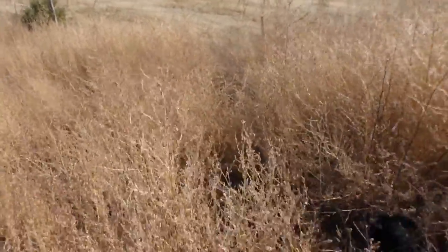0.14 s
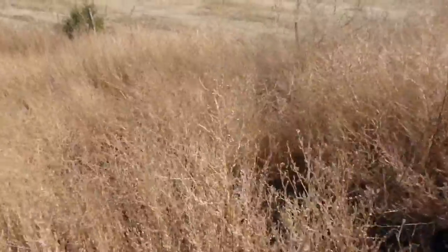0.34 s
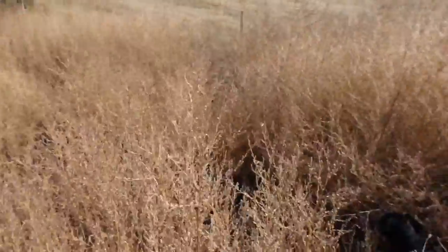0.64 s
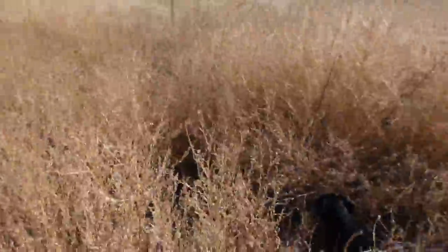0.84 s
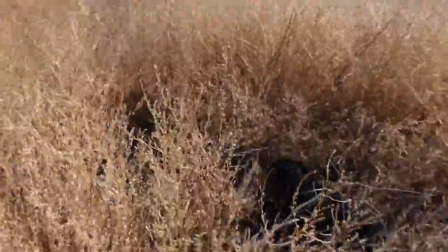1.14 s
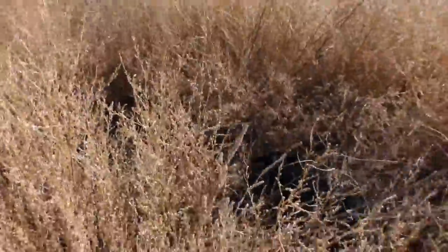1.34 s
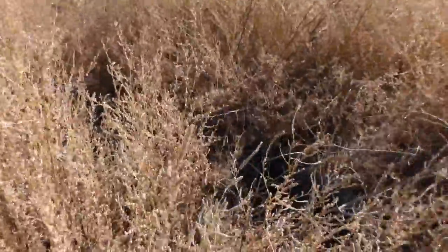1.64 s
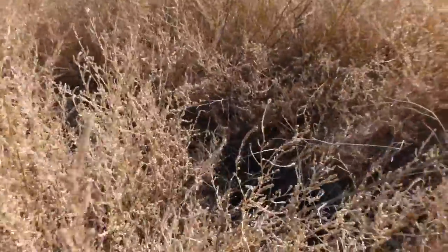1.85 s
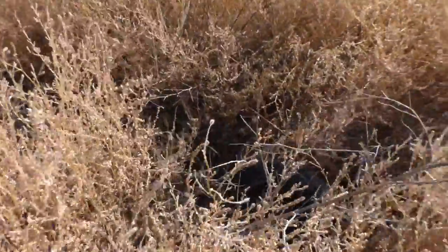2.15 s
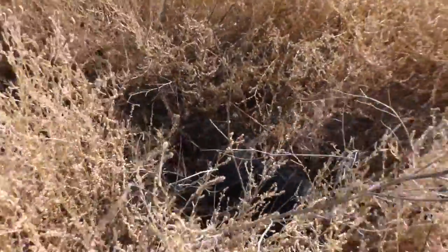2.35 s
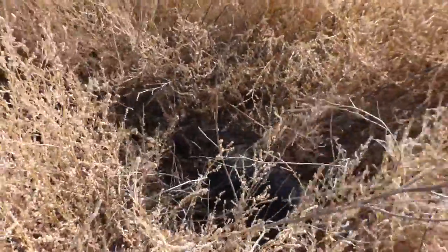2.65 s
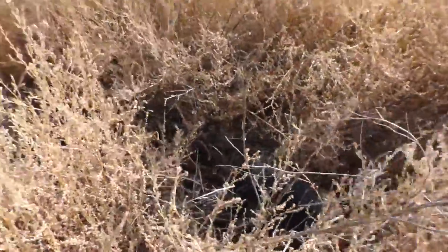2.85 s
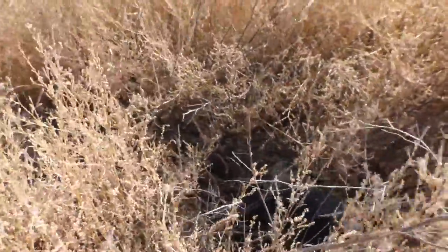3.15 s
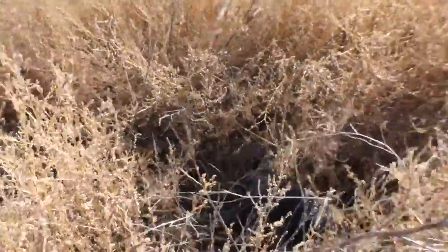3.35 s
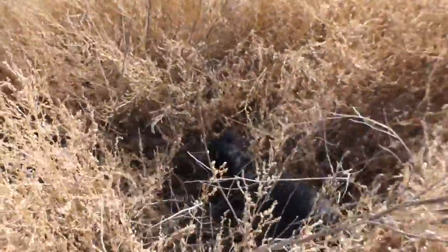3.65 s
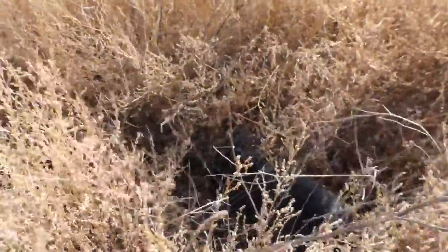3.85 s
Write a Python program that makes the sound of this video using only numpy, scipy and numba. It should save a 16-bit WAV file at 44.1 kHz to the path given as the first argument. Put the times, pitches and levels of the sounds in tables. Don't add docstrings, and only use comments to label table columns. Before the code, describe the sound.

Close outdoor sound of brittle stems cracking irregularly over a dry seed-head hiss. Gusts buffet the unprotected microphone for the first half, then mostly fade while the rustling grows, over faint open air.

```python
import sys
import numpy as np
from scipy import signal
from scipy.fft import rfft, irfft
from scipy.io import wavfile
from scipy.ndimage import uniform_filter1d
from numba import njit

SR = 44100
rng = np.random.default_rng(int(sys.argv[2]) if len(sys.argv) > 2 else 0)


def generate_wav(signal):
    frames = np.transpose(np.atleast_2d(signal))
    scaled = np.clip(frames, -1, 1) * 32767
    pcm = np.round(scaled).astype(np.int16)
    wavfile.write(sys.argv[1], SR, pcm)


def elevation(decibels):
    levels = np.asarray(decibels, float)
    return 10 ** (levels / 20)


N = 176400


def unit(x):
    return x / np.sqrt(np.mean(x ** 2))


def curve(rows, column):
    rows = np.array(rows, float)
    return np.interp(np.arange(N) / SR, rows[:, 0], rows[:, column])


def colour(x, points):
    hz, db = np.array(points, float).T
    f = np.maximum(np.arange(N // 2 + 1) * SR / N, 1)
    gain = elevation(np.interp(np.log(f), np.log(hz), db))
    return irfft(rfft(x) * gain, N)


@njit
def svf(x, hz, k):
    y, b, l = np.empty((3, len(x))), 0., 0.
    for i in range(len(x)):
        g = np.tan(np.pi * hz[i] / SR)
        v = (b + g * (x[i] - l)) / (1 + g * (g + k))
        low = l + g * v
        y[0, i], y[1, i], y[2, i] = low, k * v, x[i] - k * v - low
        b, l = 2 * v - b, 2 * low - l
    return y


def low_pass(x, hz, k):
    return svf(x, hz, k)[0]


def band_pass(x, hz, k):
    return svf(x, np.full(len(x), float(hz)), k)[1]


def walk(rate):
    k = int(SR / rate)
    steps = np.repeat(rng.standard_normal(N // k + 1), k)
    return unit(uniform_filter1d(uniform_filter1d(steps, k), k)[:N])


def fade(x, seconds):
    return signal.lfilter([1], [1, -np.exp(-1 / (seconds * SR))], x)


# start [t/s], length [t/s], buffeting [level/dB], share of
# quick small eddies [level/dB]
WIND_PUFFS = [(0, 0.016, -20, 3), (0.02, 0.064, -17.5, -2.5), (0.074, 0.079, -19, -9.5),
              (0.147, 0.075, -19, -2.5), (0.213, 0.041, -17, -10.5), (0.26, 0.037, -16, -8.5),
              (0.293, 0.059, -18.5, 4), (0.355, 0.035, -20.5, -0.5), (0.4, 0.049, -19.5, -1.5),
              (0.448, 0.023, -16, -7.5), (0.478, 0.034, -24, -5), (0.518, 0.027, -17, -14),
              (0.554, 0.077, -24.5, -11), (0.642, 0.067, -25.5, -12.5), (0.731, 0.051, -32, -18),
              (0.797, .13, -20.5, -11), (0.94, 0.1, -25, -15.5), (1.044, 0.043, -33, -14.5),
              (1.092, 0.048, -22, -23.5), (1.139, 0.16, -20.5, -17), (1.296, 0.17, -28, -19.5),
              (1.478, 0.057, -22, -17.5), (1.543, 0.1, -23.5, -20), (1.663, 0.076, -24, -20.5),
              (1.748, 0.053, -43, -25), (1.866, 0.041, -42.5, -20.5), (1.943, 0.032, -30.5, -22.5),
              (2.006, 0.086, -31, -30), (2.096, 0.17, -23.5, -19), (2.235, 0.061, -20, -7.5),
              (2.296, 0.016, -24, -20), (2.317, 0.048, -42.5, -21), (2.384, 0.094, -27.5, -15.5),
              (2.493, 0.15, -30.5, -25.5), (2.606, 0.079, -31.5, -26.5), (2.708, 0.095, -34.5, -33),
              (2.958, 0.061, -44.5, -31), (3.094, 0.093, -45, -21), (3.656, 0.097, -38.5, -33),
              (3.769, 0.12, -31, -26.5), (3.879, 0.02, -27, -16.5), (3.92, 0.069, -30.5, -24)]


def puffs():
    sag_db_per_s, edge = 26, int(0.011 * SR)
    power, quick = np.full(N, 1e-7), np.full(N, -2e-6)
    for s, length, db, share_db in WIND_PUFFS:
        start, stop = max(int(s * SR), 0), min(int((s + length) * SR), N)
        from_middle_s = np.arange(start, stop) / SR - s - length / 2
        power[start:stop] += elevation(2 * db)
        quick[start:stop] += elevation(2 * db) * (share_db - sag_db_per_s * from_middle_s)

    def soften(x):
        return uniform_filter1d(uniform_filter1d(x, edge), edge)
    return soften(np.sqrt(power)), soften(quick) / soften(power)


# time [t/s], added share of quick eddies [level/dB]
WHIPS_OF_AIR = [(0.042, 5), (0.066, 6.5), (.078, 5), (0.123, 3.5), (.168, 7.5), (.183, 3), (.198, 9.5),
                (0.207, 4.5), (.265, 8.5), (.281, 3.5), (0.297, 9), (.362, 5), (.386, 5.5), (.409, 6),
                (0.462, 0), (.542, 7.5), (.656, 7.5), (0.812, 6.5), (.866, 5.5), (0.921, 3.5), (1.016, 7),
                (1.031, 7.5), (1.165, 7), (1.437, 10), (1.512, 9.5), (1.572, 7), (2.28, 4.5), (2.395, 4),
                (2.55, 9.5), (3.94, 7.5)]


def whips():
    kick = np.zeros(N)
    s, db = np.array(WHIPS_OF_AIR).T
    kick[(s * SR).astype(int)] = db
    t = np.arange(-1024, 1025) / SR
    rise = np.exp(-(t / 0.0041) ** 2)
    return signal.fftconvolve(kick, rise, "same"), kick * rng.choice([-1, 1], N)


def wind():
    eddy_hz, pitch_db_per_db, waver_db = 588, 0.6838, 1.0
    flutter_db, flutter_per_s, port_hz = 2, 55, 78
    breeze_db, breeze_hz = -52, 72.2
    gain, share_db = puffs()
    whip_db, kick = whips()
    gain = gain * elevation(0.19 * whip_db)
    share_db = share_db + whip_db
    hz = np.clip(eddy_hz * elevation(pitch_db_per_db * share_db + waver_db * walk(90)), 40, 3000)

    flutter = rng.standard_normal(N) * elevation(flutter_db * walk(flutter_per_s))
    push = (flutter + 1.94 * kick) / np.sqrt(hz)
    edges = low_pass(push, hz, 1.75)
    edges = low_pass(edges, 2.88 * hz, 1.33)
    edges = low_pass(edges, 3.96 * hz, 1.21)
    sharp_edges = elevation(-2.5 + 3.82 * walk(300)) * edges
    eddies = low_pass(edges, 1.84 * hz, 2.08) + sharp_edges

    port = np.full(N, float(port_hz))
    eddies = svf(eddies, port, 1.0)[2]
    eddies = svf(eddies, 0.58 * port, 2.24)[2]
    slow = np.sqrt(uniform_filter1d(eddies ** 2, int(.028 * SR)) + 1e-12)

    lull = band_pass(rng.standard_normal(N), breeze_hz, 0.72)
    lull = low_pass(lull, np.full(N, 130.), 0.79)
    return eddies / slow * gain + unit(lull) * elevation(breeze_db + 1.7 * walk(12))


# time [t/s], level [level/dB]
BRUSHING_LEVEL = [(0, -46.5), (.18, -52.5), (.41, -62.5), (.62, -55.5), (.95, -61.5), (1.1, -59),
                  (1.39, -51.5), (1.7, -58.5), (2.35, -54), (2.6, -50), (2.88, -48), (3.2, -49.5),
                  (3.32, -42.5), (3.55, -41.5), (3.7, -48.5), (3.8, -51.5), (3.86, -47), (4, -44)]
# frequency [f/Hz], density [level/dB per Hz]
SEED_HEAD_SPECTRUM = [(180, -40), (300, -18), (484, -9), (877, -5), (1220, -3.5), (6680, -6), (13100, -4),
                      (15500, -2.5)]


def ticks(rate):
    spread_db, top_db, level_db, decay_s = 3, 13, -5, 0.0028
    size_db = np.minimum(spread_db * rng.exponential(size=N), top_db)
    hits = (rng.random(N) < rate / SR) * elevation(size_db)
    return elevation(level_db) * fade(uniform_filter1d(hits, size=24), decay_s)


def rustle():
    swish_db, swell_db, rustle_db = 1.2, 0.9, 2
    swell = swell_db * walk(23.84)
    wide = ticks(100)
    out = 0
    for hz in (900, 2500, 6000, 12500):
        rough = rng.standard_normal(N) * (1 + wide + ticks(180))
        out = out + band_pass(rough, hz, 1.32) * elevation(swish_db * walk(30.43) + swell)
    return unit(colour(out, SEED_HEAD_SPECTRUM)) * elevation(curve(BRUSHING_LEVEL, 1) + rustle_db)


# frequency [f/Hz], density [level/dB per Hz]
AIR_SPECTRUM = [(90, -27), (220, 4), (700, 0.5), (1500, -11), (2500, -18), (4000, -52)]


def open_air():
    hiss = unit(colour(rng.standard_normal(N), AIR_SPECTRUM))
    return elevation(-56.5) * hiss * elevation(1.8 * walk(7.55))


# time [t/s], peak [level/dB], woody body re peak [level/dB], tail
# [level/dB]
BREAKING_STEMS = [(0.0317, -22.5, -7.5, -5), (0.0764, -21, -2, -22), (0.104, -11.5, -17.5, -5.5),
                  (0.1475, -18, -15, -5), (0.2543, -32, 6, -33), (0.2879, -18, 2, -13), (0.3282, -32, 9, 6),
                  (0.435, -35, 1, -24), (0.5075, -34.5, -1, -29), (0.5559, -31.5, -4, -17),
                  (0.6201, -25.5, -4.5, -4.5), (0.7222, -19, -28, -20), (0.7613, -31.5, -4, -34),
                  (0.7821, -14.5, -19, -19), (0.843, -29.5, 0, -30), (0.8771, -18, -4, -39),
                  (0.914, -35, -4, -33), (0.939, -32, -10, -32), (0.962, -31.5, -3, -34),
                  (1.199, -28, -7.5, -13), (1.2983, -8, -23, -12), (1.3606, -17.5, -16, -17),
                  (1.4732, -19.5, -6.5, -14), (1.553, -34, -4, -15), (1.571, -16.5, -13, -34),
                  (1.6455, -26.5, 0, -35), (1.7009, -20.5, -7, -18.5),
                  (1.814, -35, -4, -20), (1.8362, -27, 2.5, -20), (1.8696, -22.5, -12, -8),
              (1.9026, -32.5, -8, -2), (1.933, -28, -3, -20), (2.0517, -13, -14.5, -16),
              (2.1, -33, -6, -27), (2.1604, -24.5, -3, -19), (2.267, -27, -15.5, 8),
              (2.3512, -42, -11, -33), (2.451, -31, -1.5, -28), (2.4842, -25, -17, -13),
              (2.566, -26, -14, -1), (2.582, -30.5, -4, -8), (2.6204, -16.5, -31, -9),
              (2.8081, -16, -12, -17), (2.8317, -19, -12.5, -37), (2.952, -22.5, -11.5, -1),
              (2.988, -28, -19, -30), (3.0629, -18.5, -8, -11), (3.2106, -14.5, -17.5, -13),
              (3.2764, -33, -4, -6), (3.358, -23, -17, -8), (3.444, -16.5, -25, -7),
              (3.4784, -14.5, -39, -4), (3.5302, -8.5, -26, -10), (3.5897, -18.5, -18, -7),
              (3.8202, -0.5, -14.5, -21.5), (3.862, -16, -36, -25), (3.881, -10.5, -23.5, -16),
              (3.923, -18.5, -7.5, -20)]
# time [t/s], peak [level/dB]
THIN_TWIGS = [(.279, -25), (.644, -25), (.712, -31.5), (.873, -24), (1.289, -22.5), (1.317, -27.5),
              (1.456, -28.5), (1.846, -33), (1.878, -34), (2.106, -31.5), (3.69, -40), (3.706, -35.5),
              (3.54, -27), (3.996, -22)]


def snaps():
    crack_s, body_s, tail_s, creak_s, lag_s = 0.00099, 0.00061, 0.015, 0.0054, 0.0008
    body_hz, body_spread, body_width = 1570, 0.27, 1.1
    snap_db, body_gain_db, tail_gain_db = -5.5, 9.5, -4
    twigs = [(s, db, -5, -26) for s, db in THIN_TWIGS]
    rows = np.array(BREAKING_STEMS + twigs, float)
    out = np.zeros(N + 4096)
    t = (np.arange(2048) - 512) / SR
    creak_and_tail = np.exp(np.where(t > 0, -t / tail_s, t / creak_s - .7))
    chance = rng.standard_normal((len(rows), 3, 2048))
    for (s, db, body_db, tail_db), (a, b, c) in zip(rows, chance):
        uneven_db = 2.7 * np.repeat(c[:32], 64)
        shiver = elevation(tail_db + tail_gain_db + uneven_db) * creak_and_tail

        crack = a * (np.exp(-t / crack_s) * np.clip(t / 0.000051, 0, 1) + shiver)
        crack = band_pass(crack, 10500 * np.exp(0.057 * np.tanh(c[40])), 1.3)

        knock = b * (np.exp(-t / body_s) * (t > 0) + 0.58 * shiver)
        knock = band_pass(knock, body_hz * np.exp(body_spread * np.tanh(c[41])), body_width)

        body_gain = elevation(min(body_db, -4) + body_gain_db)
        both = crack / np.abs(crack).max() + body_gain * knock / np.abs(knock).max()
        i = int((s + lag_s) * SR)
        out[i:i + 2048] += elevation(db + snap_db) * both
    return out[512:N + 512]


# time [t/s], peak [level/dB], pitch [f/Hz]
STALK_KNOCKS = [(0.789, -39, 1800), (.822, -35.5, 2500), (.857, -45, 2200), (1.001, -45, 3500),
                (1.043, -45, 3000), (1.505, -37.5, 2500), (1.612, -40.5, 2000), (1.694, -35, 3000),
                (1.749, -46, 1500), (1.769, -37, 9500), (1.783, -37.5, 1170), (1.793, -42, 6000),
                (1.821, -38, 2500), (1.837, -29, 900), (1.861, -39, 1100), (1.87, -27, 900),
                (1.879, -31, 1300), (1.887, -32, 1080), (1.995, -45, 1500), (2.004, -41.5, 2580),
                (2.041, -43, 1800), (2.048, -25.5, 1200), (2.053, -24.5, 784), (2.082, -39, 1100),
                (2.197, -38, 1300), (2.218, -37.5, 1900), (2.233, -42, 3580), (2.328, -39, 1500),
                (2.387, -36, 4500), (2.446, -37, 900), (2.455, -34.5, 800), (2.583, -26.5, 830),
                (2.858, -35, 2500), (2.915, -37, 12100), (2.975, -33.5, 990), (3.026, -35, 2200),
                (3.104, -33, 1320), (3.175, -44, 11000), (3.195, -37, 2000), (3.255, -29.5, 3200),
                (3.319, -27, 10000), (3.395, -24, 9000), (3.495, -26, 13500), (3.555, -31, 11000)]


def knocks():
    decay_s, width, level_db = .001, .8, 2.5
    out, t = np.zeros(N + 1024), np.arange(1024) / SR
    chance = rng.standard_normal((len(STALK_KNOCKS), len(t)))
    for (s, db, hz), noise in zip(STALK_KNOCKS, chance):
        tap = band_pass(noise * np.exp(-t / decay_s), hz, width)
        i = int(s * SR)
        out[i:i + len(t)] += elevation(db + level_db) * tap / np.abs(tap).max()
    return out[:N]


def scene():
    return (wind() + rustle() + open_air() + snaps() + knocks())[None]


def band_limit(x):
    return signal.sosfilt(signal.butter(12, 16650, fs=SR, output="sos"), x)


def record(dry):
    top_cut = signal.ellip(5, .3, 30, 15700, fs=SR, output="sos")
    mix = signal.sosfilt(top_cut, dry)
    return band_limit(mix)


dry = scene()
out = record(dry)
generate_wav(out)
```